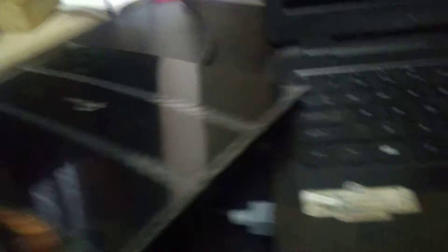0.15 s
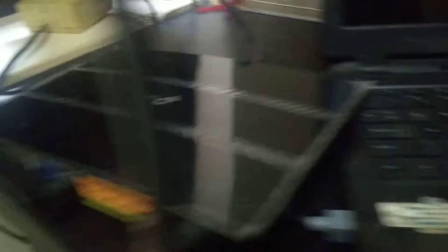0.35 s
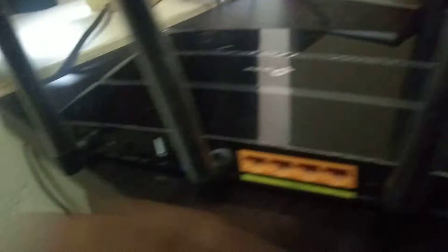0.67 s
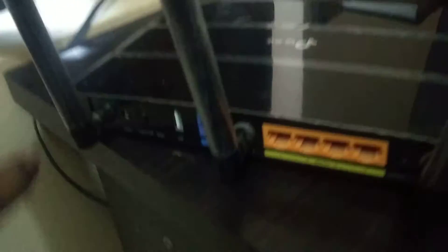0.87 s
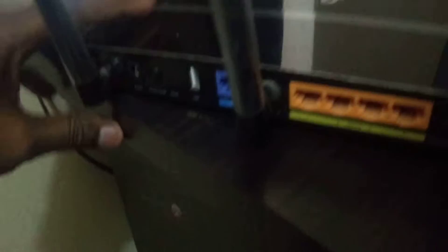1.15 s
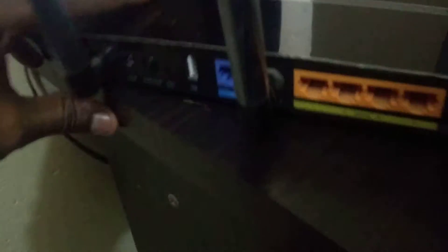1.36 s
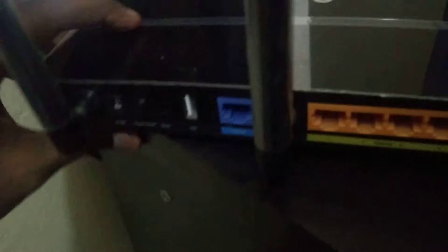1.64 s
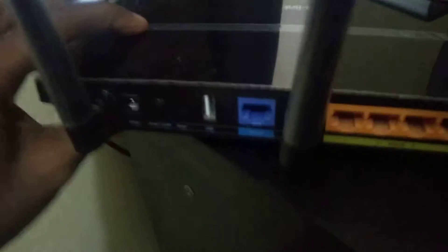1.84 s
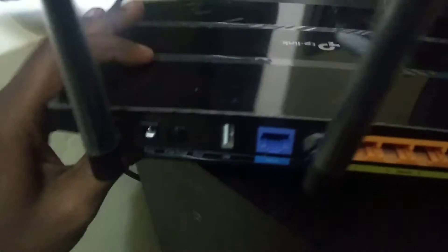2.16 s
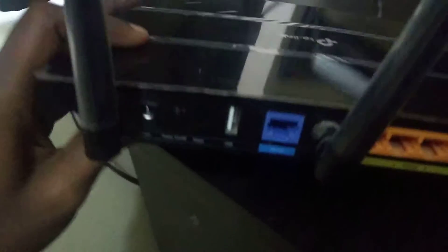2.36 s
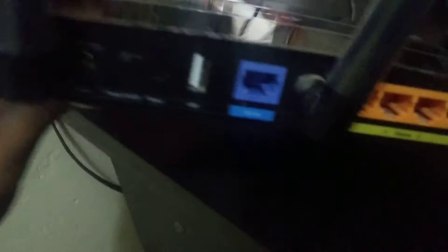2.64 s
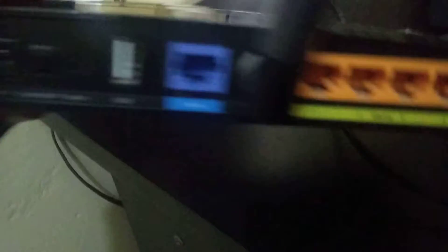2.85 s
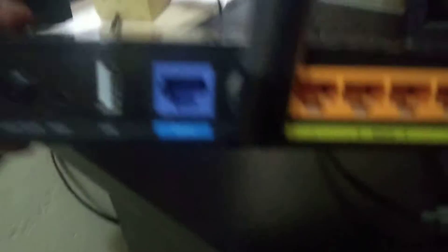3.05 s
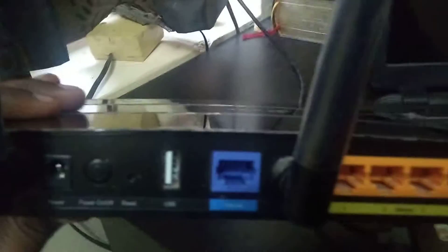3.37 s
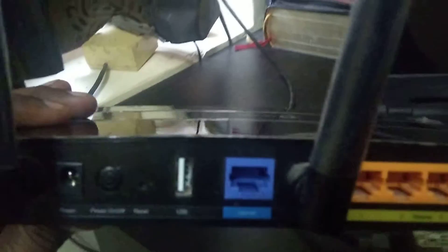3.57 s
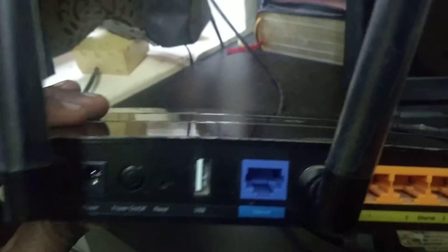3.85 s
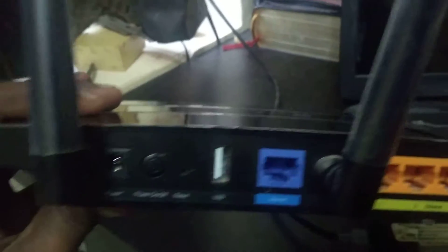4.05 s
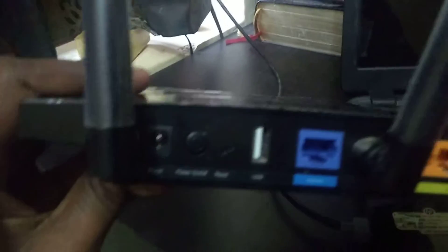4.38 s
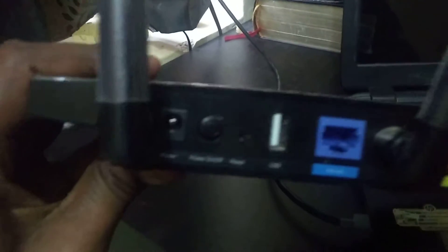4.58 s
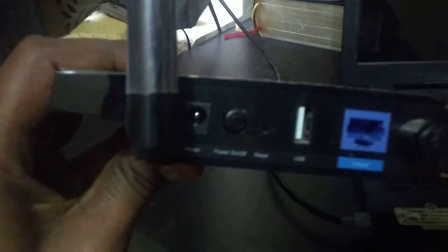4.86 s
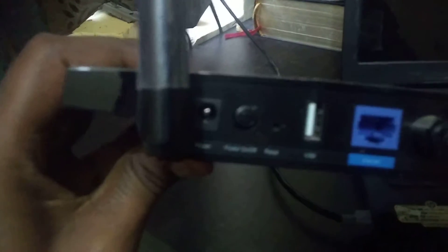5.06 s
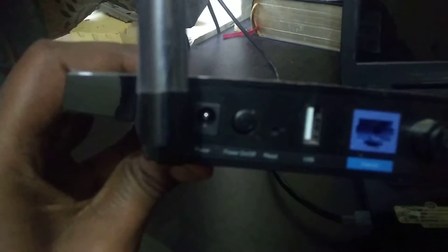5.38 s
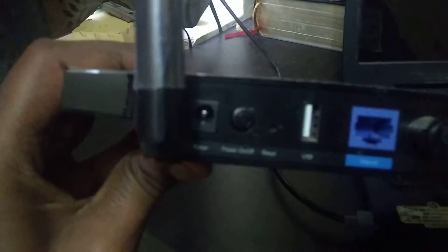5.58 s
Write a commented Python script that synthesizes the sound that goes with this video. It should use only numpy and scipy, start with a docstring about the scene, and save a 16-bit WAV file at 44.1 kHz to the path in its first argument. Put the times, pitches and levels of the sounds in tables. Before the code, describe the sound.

Plastic box dragged in short gritty scrapes, clacking down on the desk, then lifted with small clicks over a constant low fan hum.

```python
"""A fan hums in a small room while a hollow plastic router scrapes over a desk, knocks down on its feet and is lifted.
The fan is a bank of harmonics over filtered noise; friction is random micro-slips, filtered or fed to resonances.
Knocks, ticks and brushes are shaped noise and decaying modes; rasps are narrow noise, squeaks and bumps sine swells.
Bare walls add a short tail; the hand-held phone picks up soft bumps and widens its stereo image."""
import sys
import numpy as np
from scipy import signal
from scipy.fft import rfft, irfft
from scipy.io import wavfile
from scipy.ndimage import uniform_filter1d

SR = 44100
rng = np.random.default_rng(int(sys.argv[2]) if len(sys.argv) > 2 else 0)


def generate_wav(sig):
    """Save sig (samples, or channels by samples) to the path in sys.argv[1] as 16-bit PCM at SR."""
    pcm = np.round(np.clip(np.atleast_2d(sig).T, -1, 1) * 32767).astype(np.int16)
    wavfile.write(sys.argv[1], SR, pcm)


N = 252384

# pushes that drag the case: (start t/s, length/s, friction level/dB, growth over the push/dB,
# friction tilt/dB per octave, finger rub level/dB, grit as scatter of the slips/dB)
PUSHES = [(-0.014, 0.17, -3, 0.5, -1, -8, 3.3), (0.163, 0.2, -7, 1, -2.5, -9.5, 2.5),
          (0.484, 0.091, -2, 7, 0.5, -3.5, 1.5), (1.437, 0.1, -0.5, 13.5, 1.5, -2.5, 3),
          (1.557, 0.1, -4, 2.5, -2.5, -13, 3), (1.69, 0.2, -4, 11, -1, -16, 2),
          (1.91, 0.028, -1.5, -3.5, 8, -13, 1), (2.171, 0.07, -5.5, 17, 2.5, -6, 2.5),
          (2.28, 0.1, -8, -3.5, -4, -18, 3.3), (2.5, 0.14, -5, -8.5, -1, -9, 3.5)]


def undb(db):
    """Decibels to gain."""
    return 10 ** (np.asarray(db) / 20)


def gain_at(hz, points):
    """Gain of a (f/Hz, level/dB) table, interpolated on a log-frequency axis."""
    f, db = np.transpose(points)
    return undb(np.interp(np.log(np.maximum(hz, 1)), np.log(f), db))


def convolve(x, response):
    """Each channel of x through one impulse response, cut to the length of x."""
    wet = signal.oaconvolve(np.atleast_2d(x), response[None], axes=1)
    return wet[:, :x.shape[-1]].reshape(x.shape)


def colour(x, points, tilt_db=0):
    """Causal minimum-phase filter with the given spectrum, tilted about 3 kHz and above 1 kHz only."""
    size = 2048
    hz = np.arange(size // 2 + 1) * SR / size
    tilt = undb(tilt_db * np.log2(np.maximum(hz, 1000) / 3000))
    # folding the cepstrum onto positive time gives minimum phase
    cepstrum = irfft(np.log(gain_at(hz, points) * tilt))
    cepstrum[1:size // 2] *= 2
    cepstrum[size // 2 + 1:] = 0
    return convolve(x, irfft(np.exp(rfft(cepstrum))))


def ports(mid, side):
    """Left and right microphone ports: most alike in the low mids, nearly unrelated in the treble."""
    # difference between the ports: (f/Hz, side minus mid level/dB)
    side_points = [(50, -7), (110, -2.5), (220, -15), (370, -14), (550, -6), (800, -5.5), (1500, 2),
                   (4000, 0)]
    side = colour(side, side_points)
    return np.array([mid + side, mid - side])


def walk(rate, step=1):
    """Random levels held 1 / rate s and smoothed twice, one for every step samples; spread near 1."""
    k = int(SR / step / rate)
    held = np.repeat(rng.standard_normal(N // step // k + 1), k)
    smooth = uniform_filter1d(uniform_filter1d(held, k), k)
    return np.sqrt(2) * smooth[:N // step]


def add(track, s, sound):
    """Mix a sound in at time s."""
    i = max(int(s * SR), 0)
    track[:, i:i + sound.shape[-1]] += sound[..., :N - i]


def ring(modes, t, scatter_db=2, detune=0.017):
    """Decaying modes (f/Hz, level/dB, t60/s); weights, signs and pitches vary with the spot touched."""
    hz, db, t60 = np.transpose(modes)[:, :, None]
    shift, weight, sign = rng.standard_normal((3, len(modes), 1))
    size = np.sign(sign) * undb(db + scatter_db * weight - 60 * t / t60)
    return np.sum(size * np.sin(2 * np.pi * hz * (1 + detune * shift) * t), 0)


def swell(t, hz, rise_s):
    """A soft-edged oscillation whose envelope peaks after rise_s."""
    return (t / rise_s) ** 2 * np.exp(2 - 2 * t / rise_s) * np.sin(2 * np.pi * hz * t)


def fan(tone_db=-1.0, buzz_db=-2, air_db=0.0, drift=0.000757, throb_db=0.15, lean_db=0.5):
    """Every turn repeats the same motor buzz; its harmonics waver in level over rushing air."""
    # strong tones: {multiple of the beat: relative level/dB rms}
    strong_tones = {6: -59, 22: -47, 24: -47, 26: -55, 28: -55, 29: -53, 30: -51, 31: -42, 35: -47, 38: -55,
                    39: -45, 40: -40, 41: -54, 43: -55, 44: -52, 64: -56, 68: -54, 78: -60, 79: -52, 83:
                    -55, 85: -60, 90: -62, 95: -58}
    # weak tones between them: (f/Hz, relative level/dB rms)
    weak_tones = [(130, -61), (300, -54), (410, -55), (460, -82), (530, -70), (620, -67), (850, -68.5),
                  (950, -72), (1050, -88.5)]
    # rushing air: (f/Hz, level/dB per Hz)
    air_points = [(25, -90.5), (42, -84), (60, -83.5), (120, -71), (220, -76.5), (370, -70), (470, -83.5),
                  (600, -79), (740, -68.5), (880, -82), (1100, -104.5), (1700, -108), (2300, -116),
                  (3000, -111), (7000, -115), (15000, -123)]
    beat_hz, waver, wavers_per_s = 9.098, 0.4, 9
    step = 16  # the tones are built at a sixteenth of the sample rate
    angle = 2 * np.pi * np.cumsum(beat_hz * (1 + drift * walk(1.891)))[::step] / SR
    tones = np.zeros((2, len(angle)))
    for k in [6, *range(14, 112)]:
        if k in strong_tones:
            size = undb(tone_db + strong_tones[k])
        else:
            size = undb(buzz_db) * gain_at(k * beat_hz, weak_tones)
        phase = k * angle + 2 * np.pi * rng.random()
        # a tone reaches one port slightly earlier, so its side part is a quarter cycle off
        pair = np.array([np.sin(phase), np.sign(rng.standard_normal()) * np.cos(phase)])
        tones += np.sqrt(2) * size * (1 + waver * walk(wavers_per_s, step)) * pair
    throb = undb(throb_db * walk(9.0, step))
    tones = signal.resample_poly(tones * throb, step, 1, axis=1)[:, :N]
    noise = rng.standard_normal((2, N)) * np.sqrt(SR / 2)
    air = undb(air_db) * colour(noise, air_points)
    return ports(*(tones + air)) * undb([[lean_db], [-lean_db]])


def effort(t, length, growth_db):
    """Gain of one push, t seconds in: it takes hold, grows or eases, then the case coasts to rest."""
    attack_s, release_db_per_s = 0.043, 230.5
    held_db = growth_db * (np.clip(t / length, 0, 1) - .5)
    release_db = release_db_per_s * np.maximum(t - length, 0)
    return np.clip(t / attack_s, 0, 1) ** 2 * undb(held_db - release_db)


def slips(gain, grit_db):
    """Uneven micro-slips at both ports, now and then a harder catch; 0 dB per Hz where the gain is 1."""
    slips_per_s, judder_db = 4500, 2.0
    n, share = gain.shape[-1], slips_per_s / SR
    size = undb(grit_db * np.minimum(rng.exponential(size=n), 4.5))
    size = size / np.sqrt(np.mean(size ** 2))
    # both ports hear the same slip moments at independent strengths
    train = (rng.random(n) < share) * size * rng.standard_normal((2, n)) * np.sqrt(SR / 2 / share)
    return train * gain * undb(judder_db * walk(70)[:n])


def wander(x, echo=0.3, echo_s=0.00041, travel=0.094, moves_per_s=16):
    """The wave returns from the edge of the shell; the moving contact point shifts the resonances."""
    i = np.arange(N)
    late = i - SR * echo_s * (1 + travel * walk(moves_per_s))
    return np.array([c + echo * np.interp(late, i, c) for c in x]) / np.hypot(1, echo)


def slide(slide_db=-0.5):
    """The feet grind over the desk: tilt makes a push dull or bright, slip scatter smooth or gritty."""
    # colour of the friction: (f/Hz, relative level/dB per Hz)
    friction_points = [(30, -100), (130, -64.5), (240, -59), (340, -55.5), (490, -67), (660, -59),
                       (1100, -74.5), (1500, -85.5), (2400, -78.5), (3400, -81.5), (4400, -86),
                       (5700, -87.5), (7500, -99), (15000, -108)]
    out, t = np.zeros((2, N)), np.arange(SR // 2) / SR
    for s, length, db, growth_db, tilt_db, _, grit_db in PUSHES:
        grind = slips(effort(t, length, growth_db), grit_db)
        add(out, s, undb(db) * colour(grind, friction_points, tilt_db))
    return undb(slide_db) * ports(*wander(out))


def rub(rub_db=-70, shift_db=5.0, shifts_per_s=24):
    """The pushing fingers drag over the shell; as they move, one resonance after another stands out."""
    # shell resonances under a rubbing finger: (f/Hz, relative level/dB, t60/s)
    shell_modes = [(1438, -4, 0.032), (1760, 1, 0.027), (1980, 2, 0.015), (2450, -7, 0.023),
                   (3130, -19.5, 0.036), (4240, -13, 0.024), (5560, -14.5, 0.042)]
    grit_db = 3
    gain, t = np.zeros((1, N)), np.arange(SR // 2) / SR
    for s, length, _, growth_db, _, db, _ in PUSHES:
        add(gain, s, undb(db) * effort(t, length, growth_db))
    drive, out = slips(gain, grit_db), 0
    for hz, db, t60 in shell_modes:
        q = np.pi * hz * t60 / np.log(1000)  # a sharper peak rings longer
        mode = signal.iirpeak(hz, q, fs=SR)
        out = out + undb(db + shift_db * walk(shifts_per_s)) * signal.lfilter(*mode, drive)
    return undb(rub_db) * ports(*out)


def snap(t, decay_s, points, tilt_db):
    """A contact strikes, rebounds once and sets off many dense, quickly dying panel modes, as noise."""
    strike_s, rebound_s = 0.0006, 0.0023

    def strike(at):
        """Instant onset at time at, dying exponentially."""
        return (t >= at) * np.exp(-np.abs(t - at) / strike_s)

    envelope = 0.83 * np.exp(-t / decay_s) + .5 * strike(0) + strike(rebound_s)
    burst = rng.standard_normal((2, len(t))) * envelope
    return ports(*(colour(b, points, tilt_db) for b in burst))


def panel(t, hz, t60):
    """One panel bends under a blow with a 1 ms rise and rings out."""
    return (1 - np.exp(-t / 0.001)) * undb(-60 * t / t60) * np.sin(2 * np.pi * hz * t)


def knocks(body_db=-2.0, lid_db=-20, crack_db=-5.0, desk_db=-7, panel_db=0, spread_s=0.003, low_cut_hz=130):
    """Each blow cracks and bends base, top and rim; case and lid ring as the wave spreads; the desk booms."""
    # case against desk, all levels relative: (t/s, crack level/dB, crack tilt/dB per octave,
    # base thud level/dB, top clack level/dB, rim ping level/dB, rim f/Hz, hollow ring level/dB,
    # desk boom level/dB)
    blows = [(0.0145, -12.5, -3, -26, -5.5, -19.5, 1670, -19, -15),
             (0.0231, -16, -3.5, -5.5, -26, -18, 1444, -12, -23.5),
             (0.257, -22.5, -4.5, -36, -32, -39, 1205, -32, -46),
             (0.2622, -25, -1, -32, -25, -52, 1520, -28.5, -40),
             (0.2751, -18.5, -9, -7.5, -19.5, -32, 1790, -17, -14.5),
             (0.2815, -31, 1, -28, -24.5, -27, 1370, -30, -11),
             (0.310, -40, -5, -20, -44, -38, 1780, -26, -16),
             (0.645, -27.5, -12, -34, -34, -29.5, 1266, -31, -25),
             (1.5463, -21.5, -4, -19, -16, -23, 1683, -18, -19),
             (1.585, -46, -3.5, -16.5, -27, -36.5, 1370, -25, -31.5),
             (1.6155, -18, -3, -26, -22.5, -26.5, 1205, -21.5, -31),
             (1.8205, -18.5, -6.5, -33, -16.5, -26, 1400, -30, -24.5),
             (1.8465, -10.5, -5, -7.5, -29, -22.5, 1522, -14.5, -13),
             (1.861, -43, -6.5, -28, -23.5, -32.5, 1400, -31.5, -22),
             (1.8735, -13, -0.5, -24, -12, -16, 1430, -20, -18),
             (2.209, -47, -4, -14, -38.5, -43.5, 1780, -33, -36.5),
             (2.2213, -39.5, -0.5, -23.5, -31.5, -31.5, 1830, -28, -43),
             (2.2352, -20, -8.5, -9, -17, -24.5, 1546, -24, -22.5),
             (2.2390, -17, 0.5, -16, -14.5, -25.5, 1150, -15, -14),
             (2.259, -36, -9, -15, -17.5, -37, 1420, -23, -23),
             (2.3515, -31, 0.5, -32, -28, -33.5, 1270, -29, -27)]
    # modes of the hollow case on the desk, the lid panels and the desk: (f/Hz, relative level/dB, t60/s)
    case_modes = [(171, -1.5, 0.047), (246.7, -6.5, 0.31), (310, 1.5, 0.061), (330.4, 1, 0.068),
                  (422, 8, 0.02), (548, -7.5, 0.082), (600, -1.5, 0.04), (667, -7.5, 0.05),
                  (716, -7.5, 0.058), (1030, -25, 0.068)]
    lid_modes = [(1190, -2.5, 0.068), (1540, -1, 0.023), (1600, -1.5, 0.077), (1580, 4.5, 0.02),
                 (1870, 14.5, 0.014), (2022, 9.5, 0.029), (2170, 1, 0.0059), (2817, 2, 0.0246),
                 (3400, -19, 0.0092), (5380, -19.5, 0.0067)]
    desk_modes = [(170.3, -19, 0.37), (245.4, -9, 0.48), (311.8, -8.5, 0.6)]
    # crack of hard plastic: (f/Hz, relative level/dB)
    crack_points = [(40, -31), (150, -11.5), (600, -8), (1100, -3.5), (1500, 0), (2300, 5.5), (3400, -1),
                    (4300, 2), (5500, -0.5), (8000, -8.5), (12000, -16), (16000, -16.5)]
    out, t = np.zeros((2, N)), np.arange(SR // 7) / SR
    boom_t = np.arange(SR // 3) / SR
    spread = 1 - np.exp(-t / spread_s)

    def hollow(modes):
        """Modes that build up as the wave spreads."""
        return spread * ports(ring(modes, t), ring(modes, t))

    for s, sharp_db, tilt_db, base_db, top_db, rim_db, rim_hz, hollow_db, boom_db in blows:
        base = undb(base_db) * panel(t, 365, 0.025)
        top = undb(top_db) * panel(t, 680, 0.04)
        rim = undb(rim_db) * panel(t, rim_hz, 0.042)  # its pitch depends on where the blow lands
        body = undb(body_db + hollow_db) * hollow(case_modes)
        crack = undb(crack_db) * snap(t, 0.004, crack_points, tilt_db) + undb(lid_db) * hollow(lid_modes)
        add(out, s, undb(panel_db) * (base + top + rim) + body + undb(sharp_db) * crack)
        boom = ring(desk_modes, boom_t, scatter_db=2.0, detune=.005)
        add(out, s, undb(desk_db + boom_db) * boom)
    return signal.sosfilt(signal.butter(2, low_cut_hz, "highpass", fs=SR, output="sos"), out)


def ticks(tick_db=0, decay_s=0.0051, ring_decay_s=0.0058, ring_width=0.25, tail_db=-19, tail_s=0.0093):
    """Seams and hinges give under the grip: a snap, and band-passed noise as that part's close modes."""
    # light ticks of shell and aerial hinges: (t/s, level/dB, tilt/dB per octave, part f/Hz,
    # its ring level over the tick/dB)
    clicks = [(0.2575, -38.5, -3.5, 5660, 13), (1.461, -35.5, -4, 1750, 3), (2.1626, -38, -2, 2060, 10),
              (2.185, -44, -3, 5600, 0), (2.2207, -50, 3, 5570, 0), (2.519, -34.5, -4.5, 1580, 4),
              (2.597, -26.5, -6.5, 5930, 7), (2.601, -28, -1, 5140, -6), (2.619, -40, 0, 6000, -2.5),
              (2.629, -44, -2, 3530, 13), (2.649, -38.5, -3, 1470, 3), (2.7494, -39.5, -1.5, 3300, 12),
              (2.7616, -34.5, -5, 3050, 4), (2.774, -41, -5, 4030, 4), (2.792, -42, -3, 3240, 8),
              (4.6150, -41.5, 1.5, 3900, 8.5)]
    # colour of a tick: (f/Hz, relative level/dB)
    tick_points = [(500, -39.5), (1600, 2.5), (2300, -2.5), (3100, -8), (3900, 3), (4700, 2), (5800, -0.5),
                   (7200, -1), (8500, -4.5), (10500, -5), (16000, -8)]
    out, t = np.zeros((2, N)), np.arange(SR // 7) / SR
    fade = np.exp(-t / ring_decay_s) + undb(tail_db) * np.exp(-t / tail_s)
    for s, db, tilt_db, hz, ring_db in clicks:
        edges = hz * np.exp(np.array([-.5, .5]) * ring_width)
        band = signal.butter(2, edges, "bandpass", fs=SR, output="sos")
        cluster = ports(*signal.sosfilt(band, rng.standard_normal((2, len(t))) * fade))
        tick = snap(t, decay_s, tick_points, tilt_db) + undb(ring_db) * cluster
        add(out, s, undb(tick_db + db) * tick)
    return out


def rasps(rasp_db=0, width_hz=130, growth_db=5):
    """A fingertip catches on the shell; its dense slips, as noise, keep a single resonance singing."""
    # catches of the fingertip: (start t/s, length/s, level/dB, f/Hz)
    catches = [(0.522, 0.075, -55, 1375), (2.208, 0.025, -53, 1800), (2.521, 0.06, -45.5, 1546)]
    out, t = np.zeros((2, N)), np.arange(SR // 5) / SR
    for s, length, db, hz in catches:
        edges = [hz - width_hz / 2, hz + width_hz / 2]
        band = signal.butter(2, edges, "bandpass", fs=SR, output="sos")
        tone = signal.sosfilt(band, rng.standard_normal((2, len(t))))
        tone = tone / tone.std()
        add(out, s, undb(rasp_db + db) * ports(*tone) * effort(t, length, growth_db))
    return out


def brushes(brush_db=-30):
    """Fingers brush along an aerial: a swell of noise makes the modes of its hinge sing."""
    # strokes: (start t/s, time to the peak/s, relative level/dB)
    strokes = [(1.429, 0.021, -7), (1.458, 0.033, 3), (1.755, 0.021, 2), (4.569, 0.0036, -13)]
    # aerial hinges: (f/Hz, relative level/dB, t60/s)
    hinge_modes = [(1660, -2, 0.035), (2610, -5.5, 0.018), (3030, -3, 0.0134), (4110, -4.5, 0.018),
                   (5790, -8.5, 0.013)]
    out, t = np.zeros((2, N)), np.arange(SR // 7) / SR
    hinge = ring(hinge_modes, np.arange(SR // 20) / SR, scatter_db=4.5, detune=.005)
    hinge = hinge / np.abs(rfft(hinge)).max()  # its strongest resonance passes at gain 1
    for s, length, db in strokes:
        envelope = t / length * np.exp(.5 - .5 * (t / length) ** 2)
        stroke = rng.standard_normal((2, len(t))) * envelope
        add(out, s, undb(brush_db + db) * ports(*convolve(stroke, hinge)))
    return out


def bumps(far_port=0.021, rise_s=0.012):
    """The hand bumps the phone: low thuds through its body, mostly at the left port."""
    # soft bumps: (t/s, level/dB, f/Hz)
    thuds = [(1.869, -17, 115), (1.914, -22, 115), (1.983, -21.5, 112), (2.243, -21, 107),
             (2.281, -22, 107), (2.354, -24.5, 105), (2.983, -22, 93.5), (3.048, -26.5, 117),
             (3.287, -20.5, 132), (3.332, -28, 85)]
    out, t = np.zeros((2, N)), np.arange(SR // 5) / SR
    for s, db, hz in thuds:
        add(out, s, undb(db) * swell(t, hz, rise_s) * np.array([[1], [far_port]]))
    return out


def squeaks(squeak_db=-2, rise_s=0.0087):
    """Skin slips briefly on the glossy plastic: a faint sine swell."""
    # squeaks of the grip: (t/s, relative level/dB, f/Hz)
    chirps = [(4.567, -58, 1560), (4.695, -59, 1154), (4.735, -62, 1196), (4.82, -62.5, 1150),
              (5.3, -68.5, 1650), (5.45, -65.5, 1684), (5.678, -59, 1700)]
    out, t = np.zeros((2, N)), np.arange(SR // 10) / SR
    for s, db, hz in chirps:
        add(out, s, undb(squeak_db + db) * swell(t, hz, rise_s))
    return out


def room(x, wet_db=-8.5, t60=0.34, onset_s=0.0014):
    """Bare walls return a short diffuse tail: decaying noise as impulse response."""
    t = np.arange(int(.6 * SR)) / SR
    tail = rng.standard_normal((2, len(t))) * undb(-60 * t / t60) * (1 - np.exp(-t / onset_s))
    tail *= undb(wet_db) / np.sqrt(np.sum(tail[0] ** 2))
    return x + ports(*(convolve(x.mean(0), h) for h in tail))


def scene():
    """The handled case in the room, the fan and the hand on the phone."""
    case = knocks() + ticks() + slide() + rub() + rasps() + brushes() + squeaks()
    return room(case) + fan() + bumps()


def record(dry, crossfeed=0.64, lag_s=0.0004393, shadow_hz=5500):
    """The phone subtracts a late, dulled copy of the other channel, colours each port and cuts the top."""
    # sensitivity of the left port over the right: (f/Hz, level/dB)
    balance_points = [(250, -1.5), (600, 1), (1300, 1.5), (3000, -0.5), (5500, -1.5), (8500, -3),
                      (14000, -4)]
    top_hz = 15700
    hz = np.arange(N // 2 + 1) * SR / N
    cross = min(crossfeed, 1) * np.exp(-2j * np.pi * hz * lag_s) / np.hypot(1, hz / shadow_hz)
    # half the difference goes to each port
    lean = gain_at(hz, balance_points) ** np.array([[.5], [-.5]])
    wide = irfft((rfft(dry) - rfft(dry[::-1]) * cross) * lean, N)
    return signal.sosfilt(signal.ellip(8, .2, 70, top_hz, fs=SR, output="sos"), wide)


dry = scene()
out = record(dry)
generate_wav(out)
```